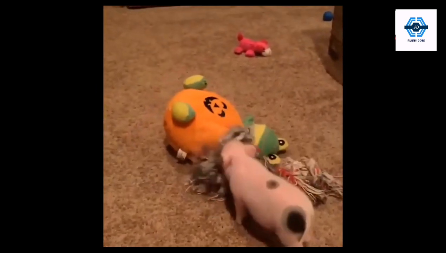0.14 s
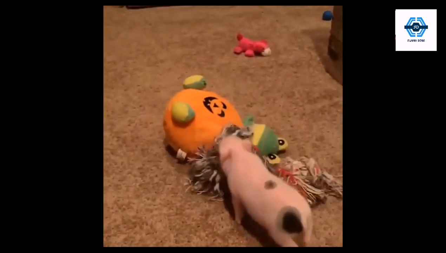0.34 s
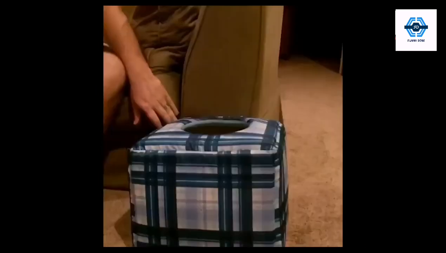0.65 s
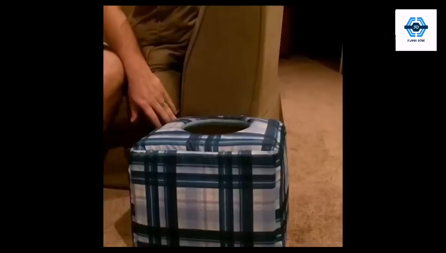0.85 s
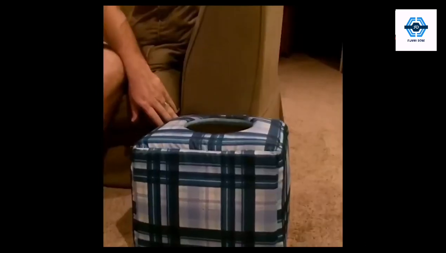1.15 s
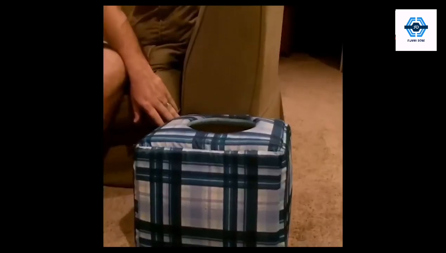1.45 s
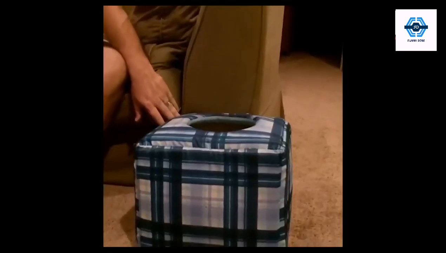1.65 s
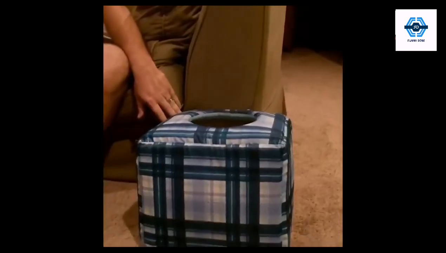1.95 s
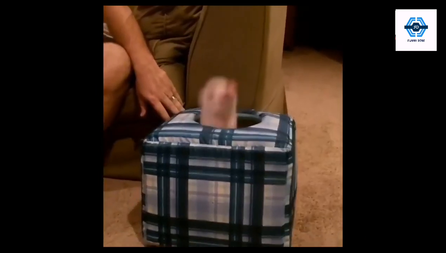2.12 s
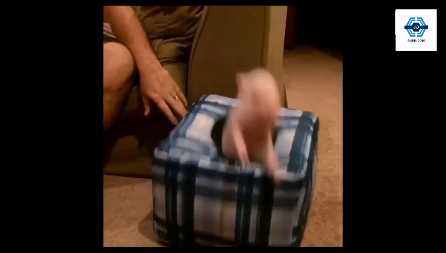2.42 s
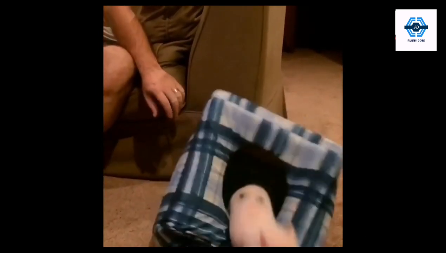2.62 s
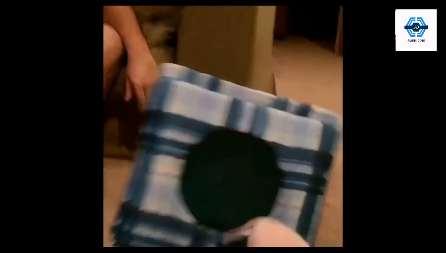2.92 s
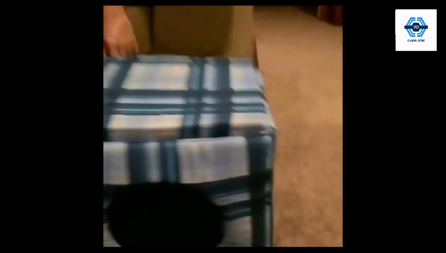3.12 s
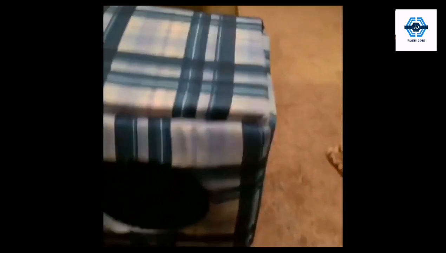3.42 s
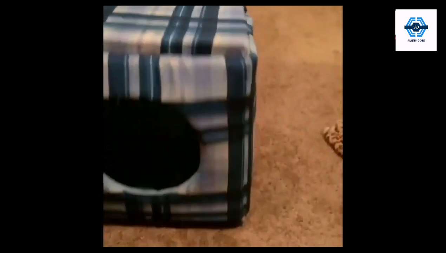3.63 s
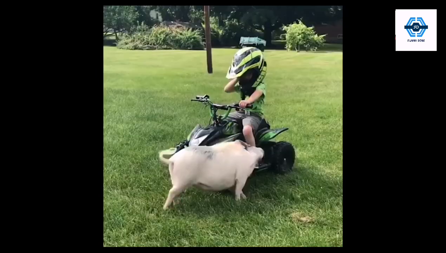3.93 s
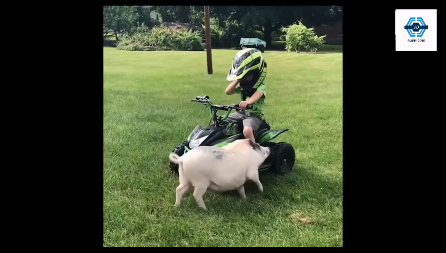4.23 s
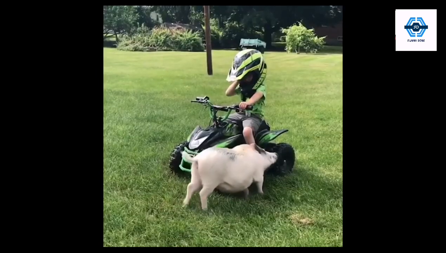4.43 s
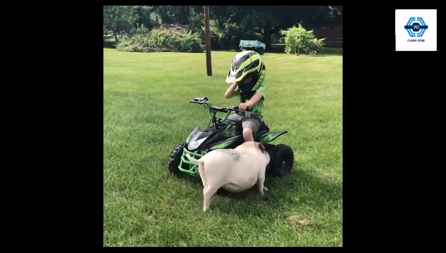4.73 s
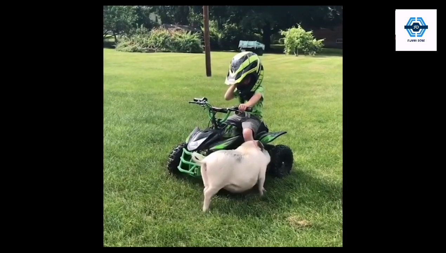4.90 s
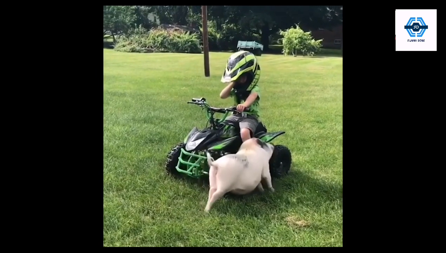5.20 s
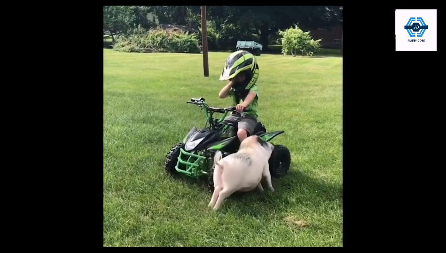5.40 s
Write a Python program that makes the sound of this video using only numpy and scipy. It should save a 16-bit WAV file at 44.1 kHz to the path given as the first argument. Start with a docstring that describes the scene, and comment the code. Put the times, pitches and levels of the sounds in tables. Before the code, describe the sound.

A piglet grunts and squeals indoors, screams while tumbling from a padded cloth cube, then a quiet lawn with distant engine and birds.

```python
"""First the quiet air of a carpeted living room, then a piglet close by: grunts, short squeals and a thin whistle.
It screams as it scrambles out of a soft cloth cube, which tumbles over with padded knocks and swishes of fabric.
After a short silence: a lawn with a distant engine, faint whines and birds.
Vocal folds are oscillators roughened by rasp, grunts are pulses ringing resonances, knocks are damped tones;
air, cloth and rumble are coloured noise, and machines, birds and whines are wavering near-sine tones."""
import sys
import numpy as np
from scipy import signal
from scipy.fft import rfft, irfft, next_fast_len
from scipy.io import wavfile
from scipy.ndimage import uniform_filter1d

SR = 44100
rng = np.random.default_rng(int(sys.argv[2]) if len(sys.argv) > 2 else 0)


def digitize_waveform(pressure):
    """Quantize a signal to 16-bit integers and store it at the path in sys.argv[1].

    Rows of a 2-D input are taken as channels; values are limited to [-1, 1].
    """
    field = np.atleast_2d(pressure).T
    bounded = np.clip(field, -1, 1)
    quanta = np.round(bounded * 32767).astype(np.int16)
    wavfile.write(sys.argv[1], SR, quanta)


N = 245107
TIME = np.arange(N) / SR
TOP_HZ = 15100  # upper limit of the recorder

# quiet room, piglet and cube, lawn (start t/s, end t/s)
PASSAGES = [(0, .828), (.873, 4.056), (4.121, 5.6)]
# spectrum of the room air (f/Hz, level/dB)
ROOM_AIR = [(15, -30), (25, -35), (66, -1), (121, -3), (207, -3.5), (278, -15.5), (326, -16.5), (373, -18),
            (691, -27.5), (927, -27), (1720, -34.5), (2500, -36), (15000, -46.5)]
# hum lines in the room (f/Hz, level/dB)
HUM = [(81, -70), (119.5, -62), (204, -70)]
# closed-mouth grunts (start t/s, end t/s, nominal pulse rate f/Hz, level/dB before a common trim,
# nasal resonance f/Hz, its width f/Hz)
GRUNTS = [(1.062, 1.145, 97.4, -39.5, 623, 90), (1.399, 1.465, 100.9, -38, 622, 90),
          (1.675, 1.737, 97.2, -39, 628, 90.5), (2.076, 2.131, 101.2, -40, 654, 89),
          (3.112, 3.179, 103.7, -38.5, 681, 100.4), (3.639, 3.748, 100.3, -40, 486, 190.5)]
# snout resonances (f/Hz, width f/Hz, level/dB)
SNOUT = [(1600, 220, 17), (2100, 150, -27), (4160, 1500, 0), (6240, 330, 1), (10100, 3300, 5)]
# short squeals (start t/s, lock t/s, crest t/s, let go t/s (let go before lock: loose and raspy throughout),
# end t/s, pitch before loose folds lower it: at the lock f/Hz, crest f/Hz, end f/Hz,
# fall shape (1 straight, 2 round), fundamental level/dB, overtones level/dB,
# gain of the shrill top level/dB, even harmonics level/dB,
# band shaped by the lips f/Hz, its gain level/dB, overtone change while loose level/dB)
SQUEALS = [(1.129, 1.149, 1.1, 1.14, 1.162, 1263, 1224, 1185, 1, -47, -54.5, -20, 7, 2400, 18, 8),
           (1.454, 1.468, 1.48, 1.48, 1.497, 1558, 1762, 1700, 2.3, -38.5, -41, -6.5, -1.5, 4400, 7, 5.5),
           (1.725, 1.74, 1.786, 1.867, 1.874, 1664, 2174, 1440, 1.06, -39, -42, -3.5, -6, 4030, -2.5, 4.5),
           (2.115, 2.134, 2.13, 2.1, 2.158, 1915, 2140, 2100, 1.4, -35.5, -38.5, -14.5, -5.5, 4300, -1, 0.5),
           (3.722, 3.761, 3.783, 3.807, 3.83, 1240, 1385, 872, 2.4, -41.5, -40, -8.5, -1.5, 2730, 9.5, -4),
           (4.025, 4.032, 4.034, 3.97, 4.043, 2005, 2090, 2056, 0.96, -49, -55, -11, 3, 4100, 4.5, -3)]
# spectrum of the open throat (f/Hz, level/dB)
THROAT = [(400, -10.5), (800, -10), (1500, 2), (2100, -7), (2750, -20), (3650, -0.5), (4150, 8), (4650, -4),
          (5200, -9.5), (5650, -7), (6400, 2.5), (7400, -4), (9400, 6.5), (12500, -5), (14000, -11.5)]
# mouth resonances rung by rasping air (f/Hz, width f/Hz, level/dB)
MOUTH = [(671, 75, 7.5), (1120, 230, 2), (1590, 350, 5.5), (2040, 350, 1.5), (2610, 210, 4)]
# thin high whistle (t/s, pitch f/Hz, fundamental level/dB, overtones level/dB, strain 0-1)
WHISTLE = [(2.179, 3436, -48.5, -46.5, 0.28), (2.192, 3530, -46, -51.5, 0.04),
           (2.208, 3255, -46.5, -39, 0.07), (2.224, 3040, -55, -53, 0.54)]
# torn scream on leaping out (t/s, whistle f/Hz, fold f/Hz, flap f/Hz,
# whistle level/dB, fold level/dB, flap level/dB, overtones level/dB, rasp 0-1)
SCREECH = [(2.218, 3040, 2080, 689.6, -58, -54, -60, -53, .4),
           (2.24, 3120, 2082, 702, -50, -55, -57, -43, 0.67),
           (2.258, 3130, 2100, 670, -49, -46.5, -46, -36.5, 0.75),
           (2.286, 3090, 2094, 630, -39, -42, -46, -32, 0.94),
           (2.302, 2912, 2070, 847, -51, -36.5, -48.5, -36.5, .7),
           (2.314, 2734, 1860, 996, -49, -44.5, -42, -41, 0.98),
           (2.327, 2610, 1600, 832, -51, -52.5, -46.5, -44, .8)]
# wide-open mouth in that scream (f/Hz, level/dB)
SCREECH_MOUTH = [(3100, -5), (4100, -8), (5200, 2), (6300, 3), (7200, 2), (8100, 8), (9400, -2.5),
                 (10700, 4.5)]
# scream as the cube tumbles: same columns (t/s, three f/Hz, four level/dB, rasp 0-1)
TUMBLE = [(2.812, 3780, 1351, 480.6, -57.5, -49.5, -64, -43, .95),
          (2.837, 3720, 1450, 500, -55, -49.5, -62, -37, .85),
          (2.848, 3600, 1552, 500, -50, -36.5, -55.5, -29.5, .4),
          (2.872, 3638, 1566, 508.4, -42, -36.5, -55, -28, .28),
          (2.892, 3530, 1522, 489, -46, -41, -47.5, -30.5, .42),
          (2.912, 3450, 1517, 418, -58, -53.5, -51, -37.5, .9),
          (2.923, 3077, 1542, 739, -59, -57.5, -57, -36.5, 0.23),
          (2.942, 3180, 1590, 781, -46.5, -51.5, -69, -36, .08),
          (2.961, 2814, 1405, 699, -50.5, -44.5, -52, -33, .25),
          (2.973, 2883, 1415, 747, -46.5, -44.5, -39.5, -29, 0.6),
          (2.99, 2670, 1350, 725, -56.5, -51, -44, -34, .9),
          (3.004, 2550, 1260, 680, -69, -60.5, -51, -47.5, 1)]
# wide-open mouth in the tumbling scream (f/Hz, level/dB)
TUMBLE_MOUTH = [(3600, -4), (4200, -3), (5500, 1), (7300, 2), (8400, 6.5), (9400, 4.5), (10600, 7.5),
                (12500, 7)]
# swishes of cloth (peak t/s, level/dB, rise dB/s, fall dB/s)
SWISHES = [(2.28, -47, 599.5, 75), (2.548, -51, 600, 119), (2.79, -45.5, 119.5, 37.5), (3.15, -54, 50, 46),
           (3.39, -50.5, 42, 320), (3.67, -67, 105, 16)]
# spectrum of rubbing cloth (f/Hz, level/dB)
CLOTH = [(150, 8), (700, 1.5), (2000, -2.5), (5000, -4), (9000, -1.5), (12000, -8.5), (15000, -15)]
# soft knocks of trotters and cube (t/s, ring level/dB, pitch f/Hz, ring t60 t/s, scuff level/dB)
KNOCKS = [(2.397, -48, 172, 0.041, -51), (2.423, -40, 252, 0.052, -44.5), (2.441, -49, 170, .04, -66),
          (2.539, -29.5, 148, 0.026, -50.5), (2.553, -43, 70, .08, -65), (3.078, -40.5, 136, 0.19, -57),
          (3.26, -19, 330, 0.0032, -58), (3.277, -33.5, 219, 0.032, -59), (3.501, -63, 384, 0.025, -49),
          (3.603, -42, 285, 0.0088, -64), (4.045, -53, 303, 0.022, -79)]
# open mouth in a bark (f/Hz, width f/Hz, level/dB)
BARK_MOUTH = [(854, 350, -5), (1240, 160, -11), (1750, 220, -2.5), (3550, 950, -18), (6400, 2100, -19),
              (8270, 1100, -25), (10940, 1500, -36)]
# long wavering squeal: pitch (t/s, f/Hz)
WAVER_PITCH = [(3.16, 960), (3.178, 1321), (3.19, 1396), (3.202, 1290), (3.21, 1139.5), (3.227, 1149),
               (3.245, 1089.5), (3.262, 1319), (3.278, 1424), (3.302, 1370), (3.322, 1230), (3.338, 1130.5),
               (3.358, 1220.5), (3.371, 1370.5), (3.385, 1426.5), (3.395, 1321), (3.407, 960), (3.422, 812)]
# long wavering squeal: overtones (t/s, level/dB)
WAVER_OVERTONES = [(3.16, -42), (3.18, -34.5), (3.234, -42.5), (3.274, -38.5), (3.286, -43.5), (3.35, -53),
                   (3.396, -40.5), (3.418, -62)]
# spectrum of the lawn's rumble (f/Hz, level/dB)
LAWN = [(15, -48.5), (25, -13), (44, -8.5), (122, -2.5), (173, -2), (231, -10.5), (318, -14), (472, -11.5),
        (684, -18), (966, -20), (1130, -24.5), (1920, -35), (5690, -45.5), (6500, -48), (14000, -51)]
# distant engine lines (f/Hz, level/dB)
ENGINE = [(81, -56.5), (120, -55), (161.5, -55), (186, -59.5), (293, -69), (372, -66), (410, -70),
          (477, -58), (570, -64.5), (953, -69.5)]
# single bird notes (t/s, length t/s, start f/Hz, end f/Hz, level/dB, warble as share of pitch)
BIRDS = [(4.204, 0.053, 4640, 4050, -65.5, 0.022), (4.232, 0.035, 3900, 3100, -67.5, .015),
         (4.32, .04, 3300, 2930, -63.5, 0.021), (4.425, .025, 3500, 4400, -77, .01),
         (4.458, .032, 5100, 6140, -59, 0.047), (4.5, 0.022, 2670, 2600, -72, .01),
         (4.589, 0.034, 5680, 5350, -57, .065), (4.728, 0.044, 6650, 5850, -69, .015),
         (5.128, 0.0246, 3050, 2420, -68, .01), (5.156, .025, 3250, 3700, -69, .02),
         (5.356, .025, 4800, 5580, -64.5, .03), (5.376, 0.039, 5300, 4930, -67, 0.021),
         (5.421, 0.062, 5010, 4450, -65, 0.045)]
# faint whines on the lawn (t/s, length t/s, start f/Hz, middle f/Hz, end f/Hz, level/dB)
WHINES = [(4.67, .11, 330, 365, 390, -54), (4.76, .135, 370, 491, 463, -49.5),
          (4.831, .08, 300, 280, 255, -54), (4.905, 0.096, 477, 525, 490, -53),
          (4.96, .1, 545, 575, 590, -54), (5.09, 0.18, 384.4, 410, 345, -54)]

GRUNT_SPEEDUP_PER_S = .7  # the flaps quicken as a grunt goes on
ATTACK_S, ATTACK_DB = 0.011, -5.5  # a squeal builds quickly
RELEASE_S, RELEASE_DB = 0.016, -11.5  # and sinks as the air runs out
CHOKE_HZ, CHOKE_WIDTH_HZ, CHOKE_DB = 2112, 16, -13  # a squeal drops in level above this pitch
THIN_ABOVE_HZ, THIN_DB_PER_HZ = 1610, -0.0155  # a tighter, higher squeal is purer
BURST_FADE_S, BURST_RASP = 0.0174, .85  # opening burst of air
LOOSE_RASP, CLEAN_RASP = 0.59, 0.042  # rasp added by loose folds, and rasp always present
SNAP_S = 0.00308  # where folds do lock, they lock and let go abruptly
BREAK_SHARE, SCOOP_PER_S = .11, 3.0  # loose folds sound lower; the pitch scoops up to the lock time
LOOSE_LOSS_DB = -7  # loose folds lose the fundamental


def undb(db):
    """Decibels to gain."""
    return 10 ** (np.asarray(db) / 20)


def unit(x):
    """Scale to rms 1."""
    return x / np.sqrt(np.mean(x ** 2) + 1e-20)


def steady(x):
    """Hold the short-term rms near 1."""
    return x / np.sqrt(np.abs(uniform_filter1d(x ** 2, size=500)) + 1e-12)


def curves(table, t):
    """The columns of a table, joined by straight lines in time."""
    s, *columns = np.transpose(table)
    return [np.interp(t, s, c) for c in columns]


def gain_at(points, hz):
    """Gain of a (f/Hz, level/dB) spectrum at the given frequencies."""
    f, db = np.transpose(points)
    return undb(np.interp(np.log(hz + 1), np.log(f), db))


def colour(x, points):
    """Filter by a (f/Hz, level/dB) spectrum."""
    m = next_fast_len(len(x))
    gain = gain_at(points, np.fft.rfftfreq(m, 1 / SR))
    return irfft(rfft(x, m) * gain, m)[:len(x)]


def noise(points, n=N):
    """Noise with the given spectrum, rms 1."""
    return unit(colour(rng.standard_normal(n), points))


def walk(rate, n=N):
    """A smooth random wander of spread about 1, with a fresh value rate times a second."""
    k = max(int(SR / rate), 2)
    steps = np.repeat(rng.standard_normal(n // k + 1), k)
    return 1.312 * uniform_filter1d(steps, k)[:n]


def butter(x, hz, kind, order=4):
    """Low-pass or high-pass."""
    return signal.sosfilt(signal.butter(order, min(hz, SR / 2 - 100), kind, fs=SR, output="sos"), x)


def resonate(x, modes):
    """Parallel (f/Hz, width f/Hz, level/dB) resonances."""
    return sum(undb(db) * signal.lfilter(*signal.iirpeak(hz, hz / width, fs=SR), x)
               for hz, width, db in modes)


def gate(t, start, end, fade_s):
    """1 from start to end, with ramps outside."""
    return np.clip(1 + np.minimum(t - start, end - t) / fade_s, 0, 1)


def swell(t, peak_s, rise_db_per_s, fall_db_per_s):
    """Level in dB that climbs to 0 at the peak and falls away."""
    return np.minimum((t - peak_s) * rise_db_per_s, (peak_s - t) * fall_db_per_s)


def turn(hz):
    """Phase of an oscillator that follows hz."""
    return 2 * np.pi * np.cumsum(hz) / SR


def span(start, end):
    """Sample indices between two times."""
    return np.arange(max(int(start * SR), 0), min(int(end * SR), N))


def place(sounds):
    """Lay (indices, samples) pairs on the time line."""
    out = np.zeros(N)
    for at, sound in sounds:
        out[at] += sound
    return out


def quiet_room():
    """Room air alone: coloured noise whose level wanders slightly."""
    return undb(-58.0) * noise(ROOM_AIR) * undb(0.62 * walk(15.7))


def tones(lines, drift, flutter_db):
    """Machine lines: sines with slightly unsteady pitch and level."""
    total = np.zeros(N)
    for hz, db in lines:
        level = np.sqrt(2) * undb(db + flutter_db * walk(12))
        total += level * np.sin(turn(hz * (1 + drift * walk(7))))
    return total


def humming_room():
    """Room air, a brighter hiss and faint hum lines behind the piglet."""
    hiss = undb(-70.5) * noise([(300, 12.0), (2000, 5.0), (10000, -3), (15000, -9.0)])
    return undb(-62.5) * noise(ROOM_AIR) + hiss + tones(HUM, drift=0.0018, flutter_db=1.0)


def reflections(x, wet_db=-16, t60=0.41, treble_t60=0.3, first_s=0.0011):
    """Add a dense tail of scattered reflections; the treble dies first."""
    t = TIME[:SR // 2]
    scatter = rng.standard_normal(len(t)) * (t > first_s)
    body = butter(scatter, 5800, "low") * undb(-60 * t / t60)
    treble = butter(scatter, 4500, "high") * undb(-60 * t / treble_t60)
    tail = body + undb(-2.5) * treble
    return x + undb(wet_db) * signal.fftconvolve(x, tail / np.sqrt(np.sum(tail ** 2)))[:N]


def grunt(start, end, hz, db, nose_hz, nose_width_hz, ring_hz=207, ring_width_hz=40, nose_db=-6,
          wheeze_db=-17, scatter_db=1.7, gurgle_db=-24):
    """Slack folds flap a few times and ring the closed mouth; each flap gurgles and wheezes through the snout."""
    at = span(start, end + 0.029)
    beats = np.arange(0, end - start, 1 / hz)
    beats = beats + GRUNT_SPEEDUP_PER_S * beats * (end - start - beats)
    chance = rng.standard_normal((len(beats), 3))
    moments = (np.abs(beats + .00042 * chance[:, 0]) * SR).astype(int)
    effort = np.sin(np.pi * (np.arange(len(beats)) + .5) / len(beats))
    pulses, puffs = np.zeros((2, len(at)))
    pulses[moments] = effort * undb(scatter_db * chance[:, 1])
    puffs[moments] = effort ** 2 * undb(0.46 * chance[:, 2])
    # each puff of air decays over 2.6 ms
    air = rng.standard_normal(len(at)) * signal.lfilter([1], [1, -np.exp(-1 / (0.0026 * SR))], puffs)
    body = resonate(pulses + undb(gurgle_db) * air,
                    [(ring_hz, ring_width_hz, 0), (nose_hz, nose_width_hz, nose_db)])
    body = butter(butter(body, 680, "low", order=6), 60, "high", order=2)
    wheeze = butter(resonate(air, SNOUT), 8200, "low")
    return at, undb(db - 4.5) * (unit(body) + undb(wheeze_db) * unit(wheeze))


def release(t, end):
    """Level in dB of a squeal as the air runs out."""
    return RELEASE_DB * np.clip(1 - (end - t) / RELEASE_S, 0, 1)


def voice(hz, low_db, high_db, rasp, depth, slow_hz, shrill_db, edge_hz, even_db, slow_waver=0.011,
          waver=0.0084, throb=0.53, second_db=-4.0, lips=(3000, 0), lips_spread=1.22):
    """Tight folds whistle; rasp makes cycles uneven and air rush, and a slower vibration adds sidebands."""
    n = len(hz)
    slow = turn(slow_hz * (1 + slow_waver * walk(300, n)))
    sway = depth * np.sin(slow)
    jitter = .04 * rasp ** 2
    phase = turn(hz * (1 + (waver + jitter) * walk(1100, n)))
    shake = 1 + throb * depth * np.cos(slow)
    # even harmonics have their own level; each harmonic flickers as the folds' contact changes
    k = np.arange(2, 17)[:, None]
    flicker_db = 4.2 * np.array([walk(100, n) for _ in k])
    weights = undb(even_db * (k % 2 == 0) + flicker_db) * (k * hz < TOP_HZ)
    harmonics = np.sum(weights * np.sin(k * (phase + .36 * sway)), axis=0)
    overtones = colour(harmonics * shake, THROAT)
    # air escapes in uneven puffs, once a cycle
    puffs = (1 + .6 * np.cos(phase)) * shake * undb(3.5 * rasp * walk(300, n))
    rush = rng.standard_normal(n) * puffs
    hoarse = butter(butter(resonate(rush, MOUTH), 3000, "low"), 450, "high")
    hiss = butter(colour(rush, THROAT), 2700, "high")
    air_share = np.clip(np.abs(rasp) ** 2.4 + .004, 0, .99)
    tone_gain, air_gain = np.sqrt(1 - air_share), np.sqrt(air_share)
    low = tone_gain * steady(np.sin(phase + sway) * shake) + air_gain * steady(hoarse)
    high = tone_gain * steady(overtones) + air_gain * steady(hiss)
    # the top band sets how shrill the call is
    top = signal.sosfiltfilt(signal.butter(3, 7500, "high", fs=SR, output="sos"), high)
    lips_hz, lips_db = lips
    lip_curve = [(lips_hz / lips_spread, 0), (lips_hz, lips_db), (lips_hz * lips_spread, 0)]
    shaped = colour(high + top * (undb(shrill_db) - 1), lip_curve)
    high = steady(butter(shaped, edge_hz, "low", order=6))
    return undb(low_db) * (low + undb(second_db) * sway) + undb(high_db) * high


def squeal(start, lock, crest, let_go, end, lock_hz, crest_hz, end_hz, fall_shape, low_db, high_db,
           shrill_db, even_db, lips_hz, lips_db, loose_db, rise_shape=1.6):
    """Some squeals clear when the folds lock, others stay raspy; the pitch bends."""
    at = span(start - .02, end + 0.018)
    t = TIME[at]
    rising = np.interp(t, [lock, crest], [1, 0])
    falling = np.interp(t, [crest, end], [0, 1])
    loose = 1 - gate(t, lock, let_go, SNAP_S)
    hz = crest_hz + (lock_hz - crest_hz) * rising ** rise_shape + (end_hz - crest_hz) * falling ** fall_shape
    hz = hz * (1 - BREAK_SHARE * loose - SCOOP_PER_S * np.maximum(lock - t, 0))
    burst = BURST_RASP * gate(t, 0, start, BURST_FADE_S)
    rasp = np.clip(np.maximum(CLEAN_RASP + LOOSE_RASP * loose, burst), 0, 1)
    attack_db = ATTACK_DB * np.clip(1 - (t - start) / ATTACK_S, 0, 1)
    choke_db = CHOKE_DB * np.clip((hz - CHOKE_HZ) / CHOKE_WIDTH_HZ, 0, 1)
    effort_db = attack_db + release(t, end) + choke_db
    press_db = loose_db * loose + THIN_DB_PER_HZ * np.maximum(hz - THIN_ABOVE_HZ, 0)
    sound = voice(hz, low_db + effort_db + LOOSE_LOSS_DB * loose, high_db + effort_db + press_db, rasp,
                  waver=0.0085, depth=0.47 * rasp, slow_hz=313, shrill_db=shrill_db, edge_hz=12000,
                  even_db=even_db, second_db=-15, lips=(lips_hz, lips_db))
    return at, sound * gate(t, start, end, 0.003)


def whistle(depth_per_strain=1.2, cycles=5.0):
    """A thin high whistle, strained at both ends, with a slow vibration at a fifth of its pitch."""
    start, end = WHISTLE[0][0], WHISTLE[-1][0]
    at = span(start - .02, end + 0.0205)
    hz, low_db, high_db, strain = curves(WHISTLE, TIME[at])
    depth = np.clip(depth_per_strain * strain, 0, 1)
    sound = voice(hz, low_db, high_db, strain, depth, hz / cycles,
                  shrill_db=-6.5, edge_hz=10500, even_db=8.5)
    return at, sound * gate(TIME[at], start, end, 0.0045)


def scream(course, mouth, edge_hz, swing, tear, air_db, buzz_db, split_db):
    """Whistle and folds at separate pitches bend into sum and difference tones; rasp adds a splitting flap."""
    start, end = course[0][0], course[-1][0]
    at = span(start - .02, end + .02)
    n = len(at)
    high_hz, fold_hz, flap_hz, whistle_db, fold_db, flap_db, high_db, rasp = curves(course, TIME[at])

    def staggering(hz, stagger):
        """Phase that staggers more with rasp."""
        return turn(hz * (1 + .007 * walk(160, n) + stagger * rasp ** 1.5 * walk(900, n)))

    def lurch():
        """Random level changes that grow with rasp."""
        return undb((1 + .7 * rasp) * walk(450, n))

    high, fold, flap = staggering(high_hz, .045), staggering(fold_hz, .06), staggering(flap_hz, .12)
    bend = swing * np.sin(fold) + tear * rasp * np.sin(flap)
    stack = sum(undb(4.5 * walk(130, n)) * np.sin(k * high + k ** .6 * bend) for k in range(1, 5))
    buzz = sum(undb(5 * walk(130, n)) * np.sin(k * fold + tear * np.sin(flap)) for k in range(4, 9))
    air = rng.standard_normal(n) * (1 + np.cos(flap)) * rasp
    bright = colour(colour(stack + undb(buzz_db) * buzz + undb(air_db) * air, THROAT), mouth)
    overtones = steady(butter(bright, edge_hz, "low", order=8))
    piping = steady(np.sin(high - rasp * np.sin(flap)) * (1 + rasp * np.cos(flap)))
    hoarse = steady(butter(butter(resonate(air, MOUTH), 3000, "low"), 900, "high"))
    growl = steady(np.sin(fold) + undb(-16) * np.sin(fold + flap) + 1.5 * rasp ** 3 * hoarse)
    # the flap splits towards half its pitch
    flapping = steady(np.sin(flap) * (1 + undb(split_db) * rasp * np.cos(flap / 2)))
    parts = [(whistle_db, piping), (fold_db, growl), (flap_db, flapping), (high_db, overtones)]
    mix = sum(undb(db) * part * lurch() for db, part in parts)
    return at, mix * gate(TIME[at], start, end, .005)


def cloth(grain_db=1.0):
    """Fabric catches and slips as the cube rolls: grainy noise under the loudest swish of the moment."""
    swishes = [db + swell(TIME, peak_s, rise, fall) for peak_s, db, rise, fall in SWISHES]
    return noise(CLOTH) * undb(np.max(swishes, axis=0) + grain_db * walk(220))


def knock(start, db, hz, t60, scuff_db, push_s=0.0052, scuff_t60=0.021):
    """A padded blow: a decaying ring with a soft onset, and a short scuff."""
    at = span(start, start + 0.24)
    t = np.arange(len(at)) / SR
    decay = undb(-60 * np.maximum(t - push_s, 0) / t60)
    ring = np.sin(2 * np.pi * hz * t) * np.minimum(t / push_s, 1) * decay
    scuff = noise([(200, -9.5), (2000, -1.5), (5000, -26), (14000, -29)], len(at))
    return at, undb(db) * ring + undb(scuff_db) * scuff * undb(-60 * t / scuff_t60)


def bark(start=2.741, peak_s=2.778, end=2.83, db=-28, rate_hz=152, pulse_db=6.0,
         yelp_from_hz=1020, yelp_to_hz=740, yelp_s=.022, yelp_db=-39):
    """A hoarse falling yelp runs into a harsh pulsing rush of air through the open mouth."""
    at = span(start, end)
    t, n = TIME[at], len(at)
    puffs = undb(pulse_db * np.cos(turn(rate_hz * (1 + 0.12 * walk(111, n)))))
    effort_db = db + swell(t, peak_s, rise_db_per_s=478, fall_db_per_s=481)
    rush = unit(butter(resonate(puffs * rng.standard_normal(n), BARK_MOUTH), 670, "high"))
    yelp_hz = np.interp(t, [start, start + yelp_s], [yelp_from_hz, yelp_to_hz])
    yelp_hz = yelp_hz * (1 + 0.083 * walk(700, n))
    yelp = unit(np.sin(turn(yelp_hz)) * np.sqrt(puffs)) * gate(t, start + 0.0033, start + yelp_s, 0.0039)
    return at, undb(effort_db) * rush + undb(yelp_db) * yelp


def wavering(db=-40.5, tight_hz=1400, slack_hz=1240, slack_db=-6,
             split_from_s=3.232, split_to_s=3.358, split_depth=0.89):
    """A long squeal; where pitch sags the folds slacken and rasp, with a strong slow vibration in mid-call."""
    start, end = WAVER_PITCH[0][0], WAVER_PITCH[-1][0]
    at = span(start - .02, end + 0.0185)
    t = TIME[at]
    hz, high_db = curves(WAVER_PITCH, t)[0], curves(WAVER_OVERTONES, t)[0]
    slack = np.interp(hz, [slack_hz, tight_hz], [1, 0])
    split = gate(t, split_from_s, split_to_s, 0.017)
    rasp = .22 + slack * (.17 + .04 * split)
    low_db = db + slack_db * slack + 2.1 * walk(129.7, len(t)) + release(t, end + 0.0033)
    slow_hz = np.interp(t, [split_from_s, split_to_s], [350, 295])
    sound = voice(hz, low_db, high_db, rasp, depth=0.075 + split_depth * slack * split, slow_hz=slow_hz,
                  slow_waver=0.042, shrill_db=1.0, edge_hz=13000, even_db=-1.0, second_db=3.5, lips=(4100, 1))
    return at, sound * gate(t, start, end, 0.00363)


def rumble(db=-45.5, loudest_s=4.93, flicker_db=1.5):
    """Low coloured noise over the lawn that slowly swells and sinks while its level flickers."""
    swell_db = swell(TIME, loudest_s, rise_db_per_s=2.0, fall_db_per_s=3.5)
    return noise(LAWN) * undb(db + swell_db + flicker_db * walk(30))


def far_birds(count=50, db=-73):
    """Rows of faint falling chirps scattered among the trees, each within 3 dB of the given level."""
    return [(4.15 + 1.05 * when, .025, 3300 + 1700 * pitch, 2500 + 1300 * pitch, db + 6 * (size - .5))
            for when, pitch, size in rng.random((count, 3))]


def bird(start, length, from_hz, to_hz, db, warble=0.027):
    """One slurred sine note with a quick random warble."""
    at = span(start, start + length)
    hz = np.geomspace(from_hz, to_hz, len(at)) * (1 + warble * walk(500, len(at)))
    return at, undb(db) * np.sqrt(2) * np.hanning(len(at)) * np.sin(turn(hz))


def trill(start=4.655, period_s=.0555, note_s=.016, up_hz=(3650, 4550), down_hz=(3400, 2650),
          sag_hz=70, db=-64, fade_db=0.4, stray_s=.003, count=8):
    """Rows of one bird's repeated chirp: an upward flick that sinks each time, a downward slur, both fading."""
    notes = []
    for k, late in enumerate(rng.standard_normal(count)):
        when = start + k * period_s + stray_s * late
        level_db = db - k * fade_db
        notes.append((when, note_s, up_hz[0] - k * sag_hz, up_hz[1] - k * sag_hz, level_db))
        notes.append((when + .85 * note_s, note_s, *down_hz, level_db))
    return notes


def whine(start, length, from_hz, middle_hz, to_hz, db, waver=.008):
    """A pig's soft closed-mouth whine, nearly a pure tone, that bends through one arc."""
    at = span(start, start + length)
    arc = np.polyfit([-1, 0, 1], [from_hz, middle_hz, to_hz], 2)
    hz = np.polyval(arc, np.linspace(-1, 1, len(at))) * (1 + waver * walk(100, len(at)))
    return at, undb(db) * np.sqrt(2 * np.hanning(len(at))) * np.sin(turn(hz))


def lawn():
    """Distant engine lines over the rumble, birds with reflections and dry whines, with the top rolled off."""
    birds = place(bird(*row) for row in BIRDS + trill() + far_birds())
    birds = reflections(birds, wet_db=-5.5, t60=0.41, treble_t60=0.22, first_s=0.0072)
    engine = tones(ENGINE, drift=.008, flutter_db=3)
    whines = place(whine(*row) for row in WHINES)
    return butter(rumble() + engine + birds + whines, 13800, "low", order=12)


def scene():
    """Quiet room, piglet and cube, lawn, with a moment of silence between them."""
    screams = [scream(SCREECH, SCREECH_MOUTH, edge_hz=11400, swing=0.68, tear=0.98,
                      air_db=-5, buzz_db=-12, split_db=-8),
               scream(TUMBLE, TUMBLE_MOUTH, edge_hz=13800, swing=0.77, tear=0.73,
                      air_db=4, buzz_db=-5.5, split_db=3)]
    grunts = [grunt(*row) for row in GRUNTS]
    squeals = [squeal(*row) for row in SQUEALS]
    piglet = place(grunts + squeals + screams + [whistle(), bark(), wavering()])
    cube = butter(place(knock(*row) for row in KNOCKS), 45, "high", order=4) + cloth()
    indoors = reflections(piglet + cube) + humming_room()
    passages = zip([quiet_room(), indoors, lawn()], PASSAGES)
    return sum(sound * gate(TIME, *times, 0.0024) for sound, times in passages)[None]


def record(dry):
    """The recorder behind the microphone cuts the top steeply."""
    return signal.sosfilt(signal.ellip(8, .2, 70, TOP_HZ, fs=SR, output="sos"), dry)


dry = scene()
out = record(dry)
digitize_waveform(out)
```